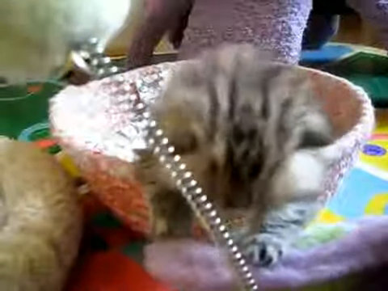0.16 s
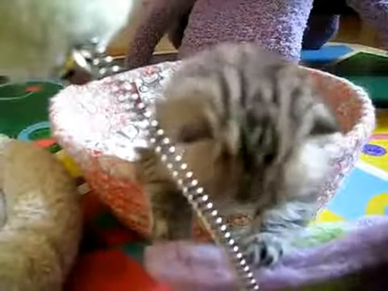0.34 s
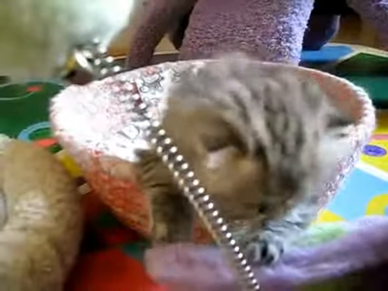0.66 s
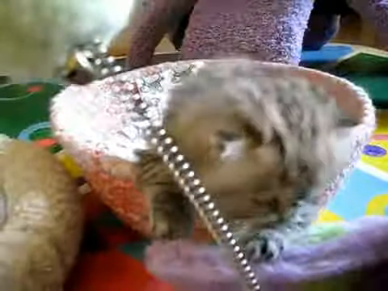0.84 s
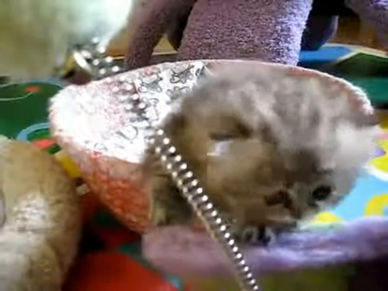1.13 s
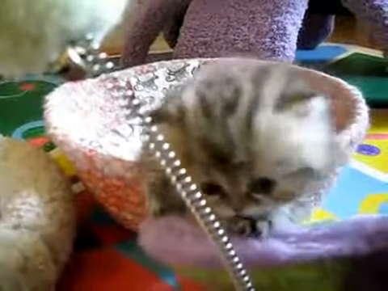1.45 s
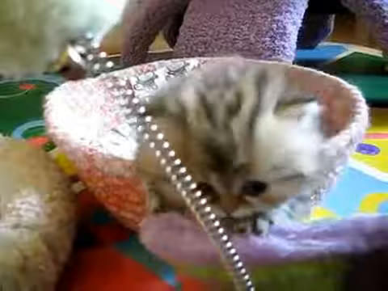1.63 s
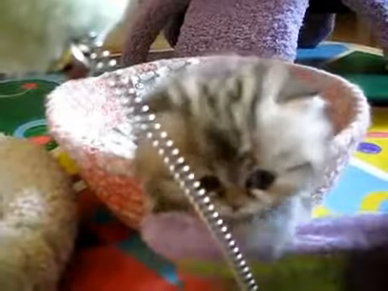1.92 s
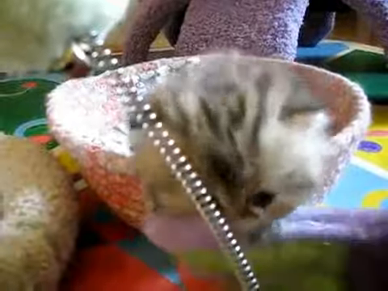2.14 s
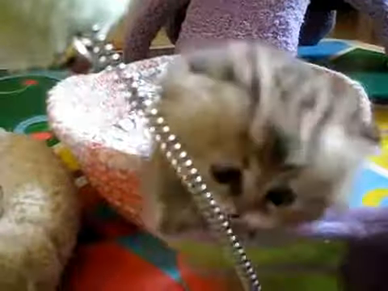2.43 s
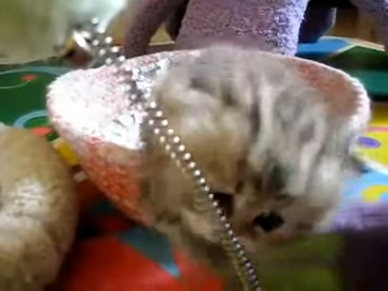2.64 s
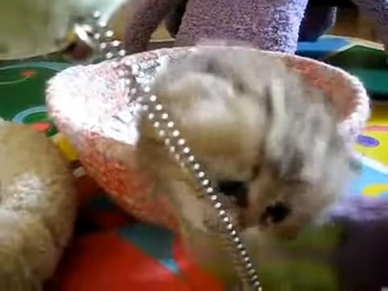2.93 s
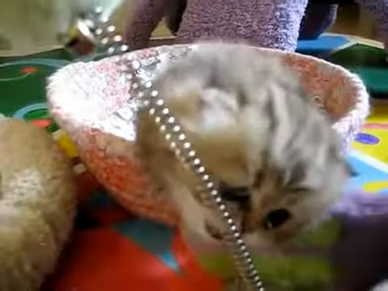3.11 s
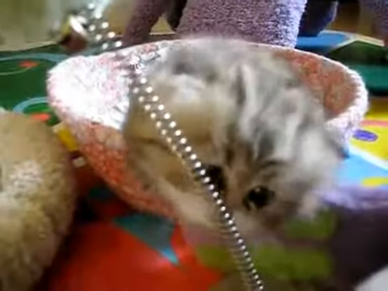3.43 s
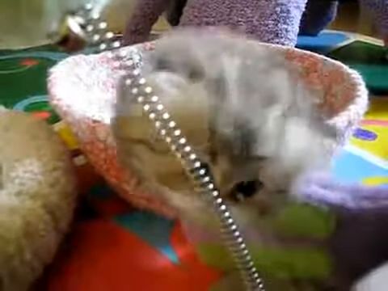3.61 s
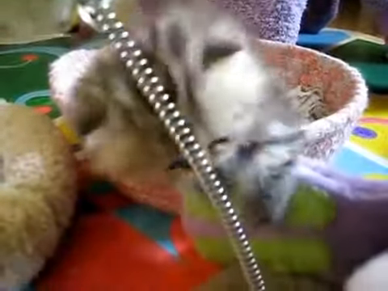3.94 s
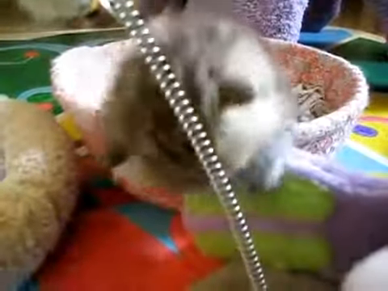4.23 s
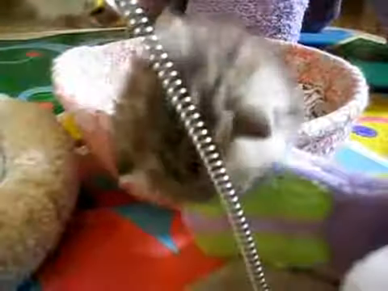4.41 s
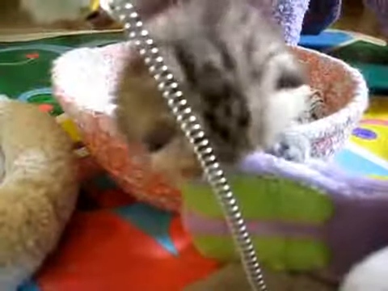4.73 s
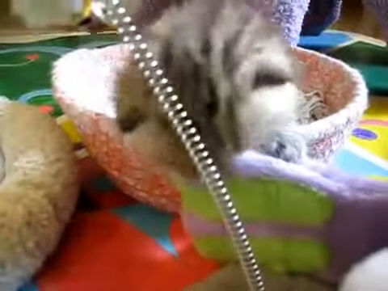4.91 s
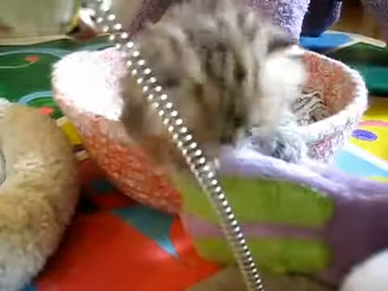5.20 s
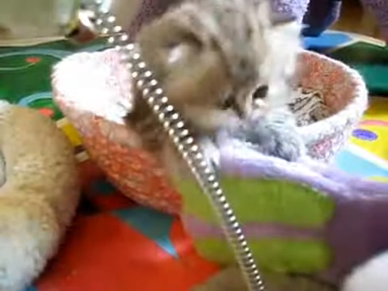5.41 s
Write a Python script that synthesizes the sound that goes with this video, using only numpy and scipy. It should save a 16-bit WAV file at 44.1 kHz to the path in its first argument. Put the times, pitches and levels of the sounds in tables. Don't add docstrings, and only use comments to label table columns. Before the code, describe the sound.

Tiny, dry metallic clicks from a bead chain being pawed and bitten in a cloth basket. Contacts are irregular: scattered at first, densest and loudest between about 2.7 and 4.2 seconds, then thinning to one bright clink and a small last knock. The sound is close and dull-topped, with slight room reflections, microphone hiss, a very faint whine and a fading distant drone.

```python
import sys
import numpy as np
from scipy import signal
from scipy.fft import rfft, irfft, next_fast_len
from scipy.io import wavfile
from scipy.ndimage import uniform_filter1d

SR = 44100
rng = np.random.default_rng(int(sys.argv[2]) if len(sys.argv) > 2 else 0)


def pcm_store(signal):
    levels = np.round(np.clip(np.atleast_2d(signal), -1, 1) * 32767)
    wavfile.write(sys.argv[1], SR, levels.astype(np.int16).T)


def gain_from_db(level_db):
    decades = np.asarray(level_db, float) / 20
    return 10 ** decades


N = 245195

SHELL_HZ, LINK_HZ = 3637, 4720
CONTACT_SWELL_S = .00042


def contact_modes(s, knock_hz, knock_db, shell_db, bead_hz, bead_db):
    link_db = (shell_db + bead_db) / 2 - 5.5
    rim_hz = (knock_hz + SHELL_HZ) / 2
    rim_db = (knock_db + shell_db) / 2 - 13
    return [(s, knock_hz, knock_db), (s, SHELL_HZ, shell_db), (s, bead_hz, bead_db),
            (s, LINK_HZ, link_db), (s, rim_hz, rim_db)]


def with_swell(modes):
    return [(s, hz, db, CONTACT_SWELL_S * (4000 / hz) ** 0.15) for s, hz, db in modes]


# (time [s], knock frequency [Hz], knock level [dB], shell level [dB], bead level [dB])
BITE_EVENTS = [(1.02, 2050, -43, -57, -62), (2.736, 2320, -40.5, -47, -47),
               (2.9395, 2250, -28.5, -41.5, -45.5), (2.9428, 2180, -29.5, -30, -36.5),
               (2.9482, 2380, -44, -56, -57), (2.9517, 2260, -42, -53, -57), (2.981, 2260, -42, -53, -50),
               (3.0011, 1912, -35, -42, -39.5), (3.0543, 2830, -39, -44, -43), (3.227, 2120, -45, -48, -50),
               (3.4346, 1920, -34.5, -28, -41), (3.6585, 1950, -34.5, -39, -40),
               (3.6597, 2100, -47.5, -40.5, -48), (3.9036, 2630, -32, -31.5, -45),
               (3.907, 2160, -43, -43.5, -52), (3.9316, 2070, -35, -35.5, -38),
               (4.7751, 1580, -43, -43.5, -50), (5.1012, 2040, -44.5, -54, -52),
               (2.947, 1900, -47, -54, -55), (3.2244, 2230, -45, -60, -59), (3.4388, 1930, -49, -55, -54),
               (3.6991, 1730, -46, -56, -61), (0.3064, 1550, -52.5, -52, -59),
               (3.3126, 1650, -46, -49.5, -63)]


def bites():
    modes = []
    for s, knock_hz, knock_db, shell_db, bead_db in BITE_EVENTS:
        modes += contact_modes(s, knock_hz, knock_db, shell_db, 5500, bead_db)
        modes.append((s, .6 * knock_hz, knock_db - 7))
    return with_swell(modes)


# (time [s], knock level [dB], shell level [dB], bead frequency [Hz], bead level [dB])
CLINK_EVENTS = [(0.0832, -63, -58, 5800, -39.5), (0.6584, -37, -45.5, 6000, -37.5),
                (0.734, -60, -52, 6150, -36.5), (0.7388, -49, -50, 6100, -41.5),
                (0.7804, -46.5, -49.5, 5120, -37.5), (0.7835, -53, -52, 5230, -46),
                (2.0635, -52, -48, 5630, -36), (2.0728, -50, -48, 5800, -32.5),
                (2.1047, -57, -47.5, 4680, -55), (2.367, -67, -56, 4984, -42),
                (3.0723, -39, -42.5, 6040, -35), (3.1244, -59, -51, 5450, -52),
                (3.702, -60, -49, 5650, -55), (3.8991, -58, -52, 5310, -52),
                (3.9289, -46.5, -33.5, 4700, -35), (3.9972, -51, -46, 4850, -54),
                (4.0822, -57, -49, 5500, -42.5), (4.1442, -59, -52, 5360, -36.5),
                (4.349, -52, -49, 5840, -43.5), (4.394, -52, -56, 5830, -52), (4.41, -64, -56, 5500, -46.5),
                (4.9465, -53, -44.5, 5910, -29.5)]


def clinks():
    modes = []
    for s, knock_db, shell_db, bead_hz, bead_db in CLINK_EVENTS:
        modes += contact_modes(s, 2300, knock_db, shell_db, bead_hz, bead_db)
    return with_swell(modes)


# (time [s], frequency [Hz], level [dB])
TICK_EVENTS = [(0.129, 5660, -49.5), (0.3602, 680, -47), (0.4833, 890, -44), (0.6715, 2330, -52),
               (0.7898, 5140, -50), (1.079, 724, -38.5), (1.2936, 814, -46), (1.4808, 5755, -51),
               (1.9254, 900, -47), (2.3365, 5630, -48), (2.6308, 2210, -45.5), (2.7205, 1924, -46),
               (2.7384, 1250, -44), (2.9566, 1570, -44), (2.9858, 4970, -52), (3.0071, 1054, -44),
               (3.013, 1610, -45), (3.0327, 1690, -49), (3.0946, 2150, -52), (3.097, 770, -49),
               (3.4446, 5830, -49), (3.8687, 1050, -44.5), (3.8816, 1260, -44), (3.9142, 1200, -49),
               (3.926, 5210, -51), (3.939, 5410, -53), (3.9736, 6140, -48), (4.004, 830, -52),
               (4.4839, 5850, -50.5)]


def ticks():
    return with_swell(TICK_EVENTS)


# (time [s], frequency [Hz], level [dB],
# swell [ms])
THUD_AND_RING_EVENTS = [(.0826, 4800, -49.5, .4), (.815, 700, -48, .55), (.7807, 6300, -42, .35),
                        (0.7807, 4600, -40, 0.39), (.7808, 2700, -46, .45), (2.0735, 850, -39, 0.49),
                        (2.0729, 1500, -45, 0.43), (2.0729, 2800, -44, 0.45), (2.736, 1200, -37.5, 0.45),
                        (2.9393, 1300, -32.5, 0.62), (3.0017, 1850, -30, 0.71), (3.0014, 1200, -37, 0.86),
                        (3.0166, 1800, -43, .6), (3.0543, 6440, -42, .4), (3.0547, 1400, -36, 0.8),
                        (3.0724, 1700, -39.5, .5), (3.227, 250, -43, 2.2), (3.227, 850, -45, 0.59),
                        (3.4345, 2400, -36, 0.33), (3.4347, 1300, -38, 0.46), (3.4347, 650, -38, 0.53),
                        (3.6586, 850, -37.5, 0.51), (3.6586, 6500, -41.5, 0.27), (3.9039, 690, -36.5, 0.53),
                        (3.9037, 1060, -32, 0.6), (3.9037, 2000, -37, .45), (3.9037, 4850, -37, 0.37),
                        (3.9071, 690, -38, 0.68), (3.929, 1300, -37, .5), (3.9316, 4600, -38, .35),
                        (2.9426, 6600, -41, .3), (2.9394, 6300, -45, 0.32), (4.144, 4550, -36.5, 0.37),
                        (4.1441, 6200, -34.5, .35), (4.1442, 1700, -44.5, 0.68), (4.9462, 1050, -42, 0.54),
                        (4.9461, 1950, -30.5, 0.5), (4.9464, 4950, -34, .4),
                        (4.349, 3000, -41, .35), (4.3496, 5300, -46, .35), (2.9812, 800, -43, .55),
                (3.002, 2750, -39, .4), (3.0015, 4900, -45, .35), (3.0731, 1600, -40, .6),
                (2.9433, 5500, -35, .45), (3.6593, 4900, -41, 0.34), (4.0822, 4600, -47, .4),
                (3.9046, 1400, -34, .5), (3.929, 2100, -43, .5), (.7807, 5900, -42, .4),
                (2.074, 1200, -43, .5), (4.1444, 6000, -38, .4), (2.9399, 1050, -38, .55),
                (2.9432, 3300, -34, .45), (5.1017, 2050, -46, .6), (4.4839, 6000, -51, .5),
                (3.0019, 3900, -45, .4)]


def thuds_and_rings():
    return [(s, hz, db, max(ms, .1) / 1000) for s, hz, db, ms in THUD_AND_RING_EVENTS]


def ping(t, hz, peak_s, turn):
    envelope = (t / peak_s) ** 2 * np.exp(-2 * t / peak_s)
    y = envelope * np.sin(2 * np.pi * (hz * t + turn))
    return y * np.sqrt(SR / 1000) / np.linalg.norm(y)


def chain():
    length = 1024
    out = np.zeros(N + length)
    t = np.arange(length) / SR
    modes = clinks() + bites() + ticks() + thuds_and_rings()
    for s, hz, db, swell_s in modes:
        delay, turn = rng.random(2)
        start = int((s - 1.3 * CONTACT_SWELL_S + .0002 * delay) * SR)
        out[start:start + length] += gain_from_db(db) * ping(t, hz, swell_s, turn)
    return out[:N]


def reflections(x):
    near_t60_s, near_db = .013, -18
    far_t60_s, far_db = 0.35, -20
    t = np.arange(SR // 2) / SR
    sparse = rng.standard_normal(len(t)) * (rng.random(len(t)) < .25) * (t > .0008)
    near = uniform_filter1d(sparse, size=3) * gain_from_db(-60 * t / near_t60_s)
    diffuse = uniform_filter1d(rng.standard_normal(len(t)), size=5)
    far = diffuse * gain_from_db(-60 * t / far_t60_s) * (t > .006)
    echo = gain_from_db(near_db) * near / np.linalg.norm(near) + gain_from_db(far_db) * far / np.linalg.norm(far)
    return signal.fftconvolve(x, echo)[:N]


def smear(x):
    t = np.arange(-1024, 1025) / SR
    haze = rng.standard_normal(len(t)) * np.exp(-(t / 0.012) ** 2)
    return gain_from_db(-15) * signal.fftconvolve(x, haze / np.linalg.norm(haze), mode="same")


def unit(x):
    return x / np.sqrt(np.mean(x ** 2))


def shaped(gain):
    size = next_fast_len(N)
    hz = np.fft.rfftfreq(size, 1 / SR) + 1e-3
    return unit(irfft(rfft(rng.standard_normal(size)) * gain(hz), size)[:N])


# (frequency [Hz], level [dB rms])
WHINE_TONES = [(1394.5, -67.5), (1440, -77)]


def motor_whine():
    t = np.arange(N) / SR
    flutter = 0.25 * shaped(lambda f: 1 / (1 + (f / 1.1) ** 2))
    return sum(gain_from_db(db) * np.sqrt(2) * np.sin(2 * np.pi * hz * t + flutter) for hz, db in WHINE_TONES)


# (time [s], frequency [Hz], level [dB rms])
DRONE_TRACK = [(0, 581.4, -63), (.5, 568, -72), (1.1, 570, -69), (1.601, 577.7, -63.5), (1.95, 567, -73.5),
               (2.401, 575, -73.5), (2.9, 581, -76.5), (3.299, 574, -88.5), (5.56, 593, -87)]


def appliance_drone():
    t = np.arange(N) / SR
    at, track_hz, track_db = np.transpose(DRONE_TRACK)
    phase = 2 * np.pi * np.cumsum(np.interp(t, at, track_hz)) / SR
    return gain_from_db(np.interp(t, at, track_db)) * np.sqrt(2) * np.sin(phase)


# (time [s], peak level [dB])
RUMBLE_SWELLS = [(0.01, -52.5), (0.39, -56), (0.81, -52.5), (1.4, -60), (3.36, -59), (4.17, -59),
                 (4.69, -64)]


def room_rumble():
    t = np.arange(N) / SR
    centre_hz, width_hz = 117, 28
    floor_db, slope_db_per_s = -68.5, 62
    swells = [np.maximum(db - slope_db_per_s * abs(t - s), floor_db) for s, db in RUMBLE_SWELLS]
    rumble = shaped(lambda f: 1 / (1 + (2 * (f - centre_hz) / width_hz) ** 2))
    return gain_from_db(np.max(swells, axis=0)) * rumble


# (frequency [Hz], density [dB per Hz])
HISS_SPECTRUM = [(12, -28), (20, -0.5), (74, -3), (109, -4.5), (177, -7), (236, -6.5), (454, -10),
                 (564, -8.5), (1140, -10.5), (1420, -13.5), (1890, -14.5), (2140, -15), (6500, -22),
                 (8450, -55), (14300, -120)]


def microphone_hiss():
    hz, db = np.transpose(HISS_SPECTRUM[:-2])
    top_hz = 6640
    return gain_from_db(-51.5) * shaped(
        lambda f: gain_from_db(np.interp(np.log(f), np.log(hz), db)) / (1 + (f / top_hz) ** 130))


# (time [s], low frequency [Hz], high frequency
# [Hz])
FLECK_EVENTS = [(.225, 4200, 6400), (.345, 6300, 6900), (.715, 5200, 6900), (.97, 4300, 5200),
                (1.295, 5200, 6400), (1.435, 4200, 5200), (1.83, 4200, 5200), (4.755, 5200, 6400)]


def flecks():
    t = np.arange(N) / SR
    out = np.zeros(N)
    for s, low_hz, high_hz in FLECK_EVENTS:
        patch = np.cos(np.pi * np.clip((t - s) / 0.031, -.5, .5))
        out += patch * shaped(lambda f: (f > low_hz) * (f < high_hz))
    return gain_from_db(-67.5) * out


def scene():
    taps = chain()
    background = motor_whine() + appliance_drone() + room_rumble() + microphone_hiss()
    mono = taps + reflections(taps) + smear(taps) + background
    side = flecks()
    return np.array([mono + side, mono - side])


def band_limit(x):
    return signal.sosfilt(signal.butter(12, 7700, fs=SR, output="sos"), x)


def record(dry):
    lowpass = signal.butter(20, 6820, fs=SR, output="sos")
    cut = signal.sosfiltfilt(lowpass, dry)
    return band_limit(cut)


dry = scene()
out = record(dry)
pcm_store(out)
```